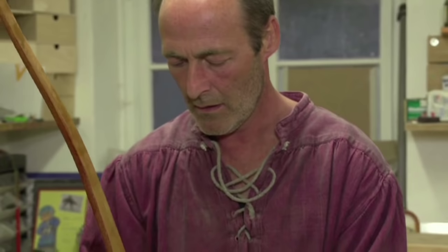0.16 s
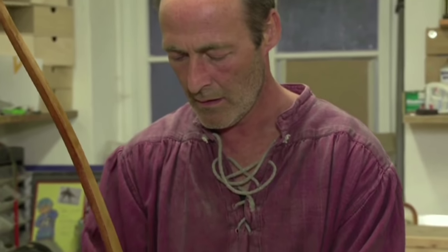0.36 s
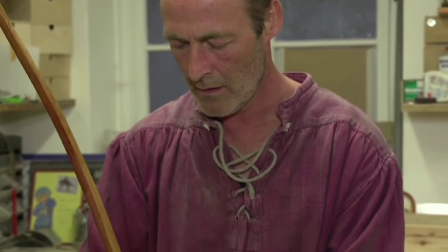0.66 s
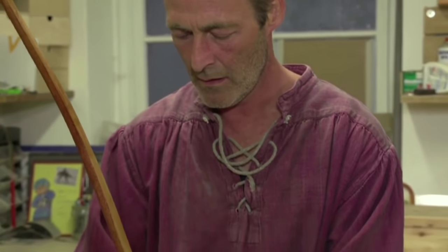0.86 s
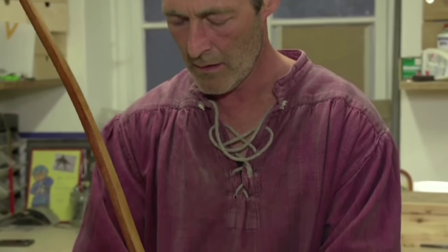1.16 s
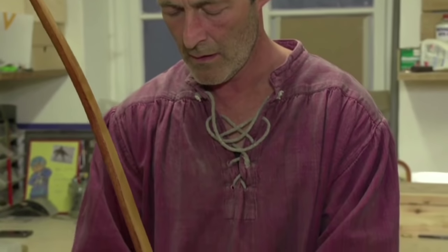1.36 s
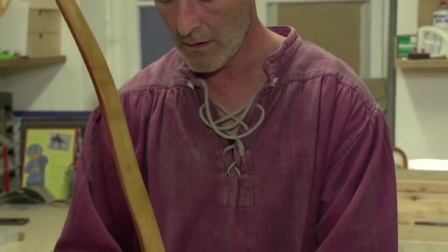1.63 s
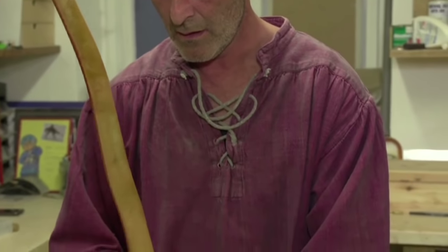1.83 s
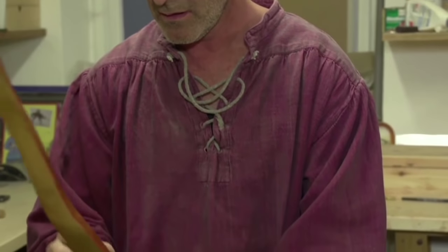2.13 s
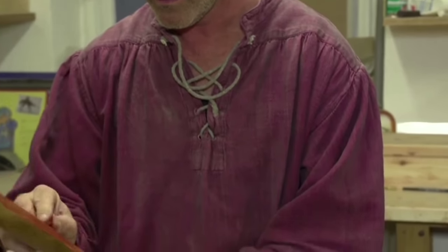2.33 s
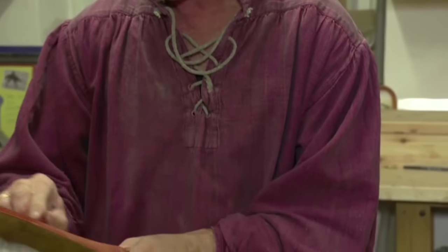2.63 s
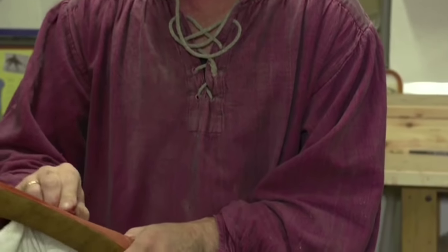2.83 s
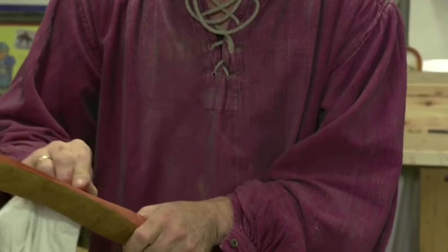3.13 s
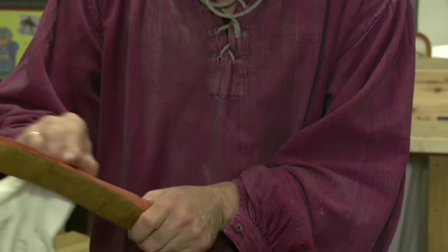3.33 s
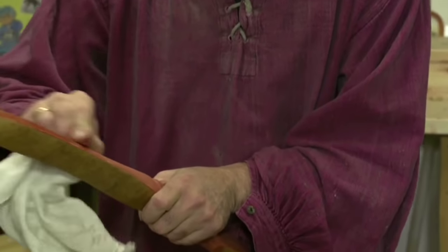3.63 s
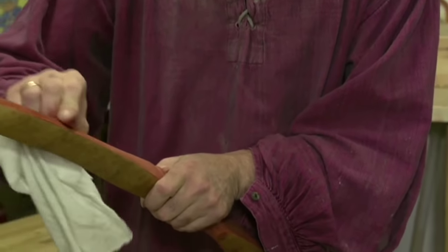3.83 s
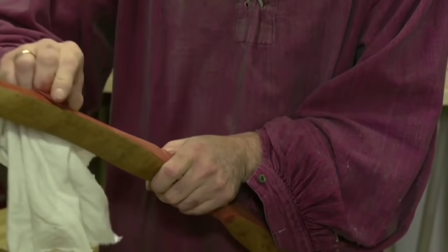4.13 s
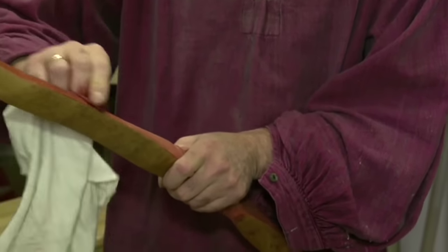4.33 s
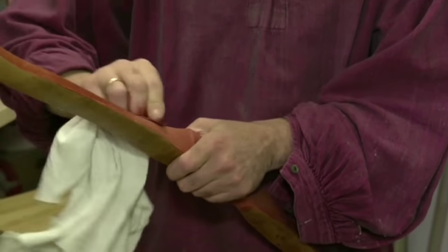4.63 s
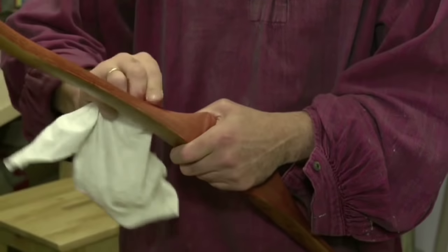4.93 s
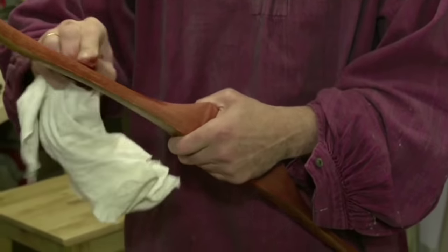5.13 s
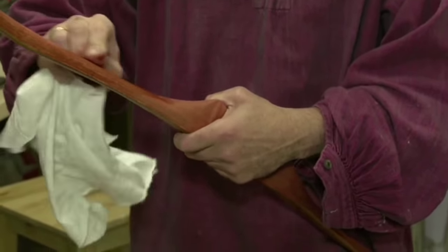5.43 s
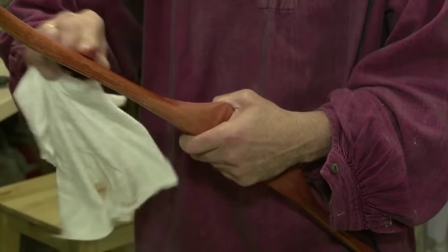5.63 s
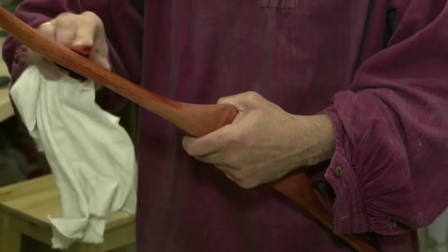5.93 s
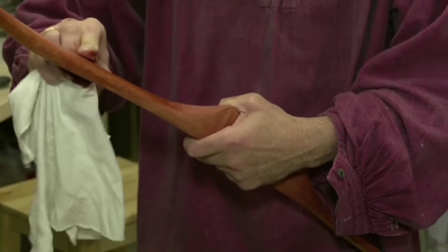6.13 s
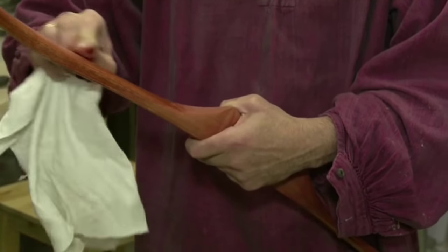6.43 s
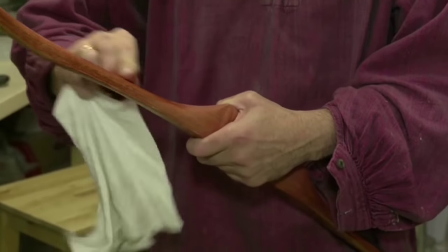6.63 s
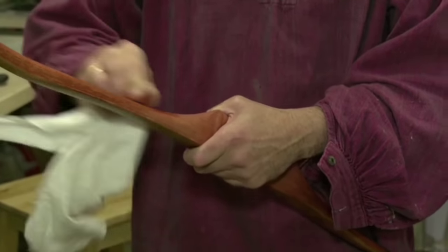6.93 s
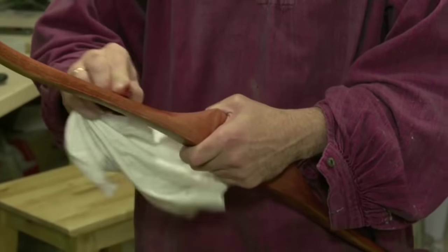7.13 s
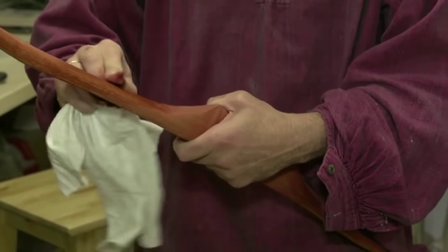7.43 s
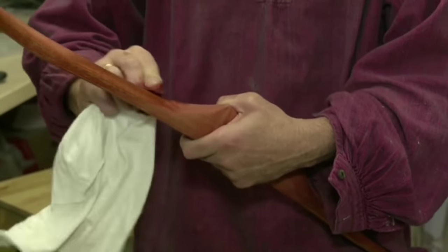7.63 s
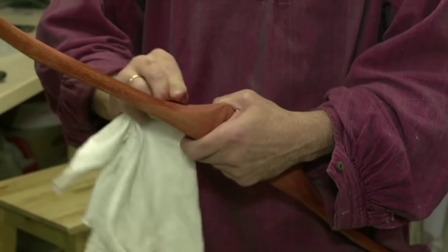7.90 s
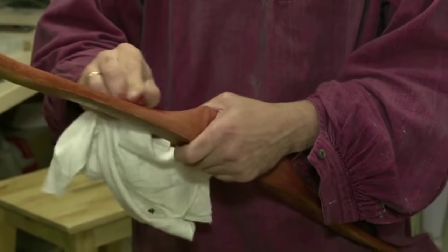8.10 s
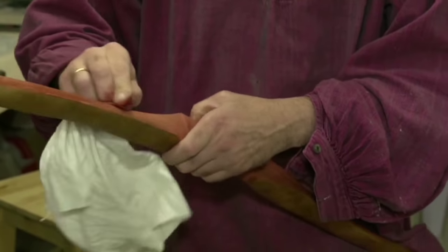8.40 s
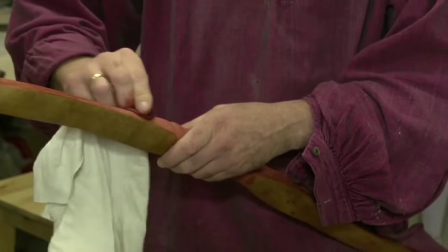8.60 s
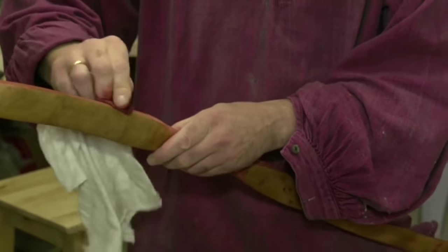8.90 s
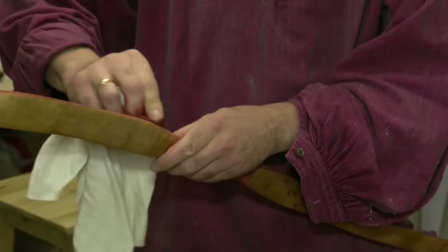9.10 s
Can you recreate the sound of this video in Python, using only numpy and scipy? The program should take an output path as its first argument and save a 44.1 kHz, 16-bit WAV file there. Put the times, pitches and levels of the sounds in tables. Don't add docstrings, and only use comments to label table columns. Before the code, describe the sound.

Close, quick, dry cloth strokes on smooth wood, faintly ringing with the grain, joined later by muffled thumps and a cluster of knocks over low room rumble.

```python
import sys
import numpy as np
from scipy import signal
from scipy.fft import rfft, irfft, next_fast_len
from scipy.io import wavfile
from scipy.ndimage import uniform_filter1d

SR = 44100
rng = np.random.default_rng(int(sys.argv[2]) if len(sys.argv) > 2 else 0)


def generate_wav(sig):
    pcm = np.round(np.clip(np.atleast_2d(sig).T, -1, 1) * 32767).astype(np.int16)
    wavfile.write(sys.argv[1], SR, pcm)


def natural_amplitude(level_db):
    exponent = np.asarray(level_db, float) / 20
    return 10 ** exponent


N = 408366
TIME_S = np.arange(N) / SR
PADDED = next_fast_len(N, True)
HZ = np.maximum(np.arange(PADDED // 2 + 1) * SR / PADDED, 1)


def rms_one(x):
    return x / np.sqrt(np.mean(x ** 2) + 1e-20)


def in_time(rows):
    s, *columns = np.transpose(rows)
    return [np.interp(TIME_S, s, column) for column in columns]


def bumps(rows):
    t = np.arange(0, N, 40) / SR
    lift_db = sum(db * np.exp(-((t - s) / half) ** 2) for s, half, db in rows)
    return np.interp(TIME_S, t, lift_db)


def at_hz(points):
    hz, value = np.transpose(points)
    return np.interp(np.log(HZ), np.log(hz), value)


def filtered(x, response):
    return irfft(rfft(x, PADDED) * response, PADDED)[..., :N]


def coloured(x, spectrum):
    return rms_one(filtered(x, natural_amplitude(at_hz(spectrum))))


def drift(rate):
    r = np.exp(-80 * np.pi * rate / SR)
    slow = signal.lfilter([1], [1, -2 * r, r * r], rng.standard_normal(N // 40 + 2002))[2000:]
    return np.interp(np.arange(N) / 40, np.arange(len(slow)), rms_one(slow))


def resonance(x, hz, width_hz):
    r = np.exp(-np.pi * width_hz / SR)
    top = np.array([1, 0, -1]) * (1 - r * r) / 2
    return signal.lfilter(top, [1, -2 * r * np.cos(2 * np.pi * hz / SR), r * r], x)


def fibre_slips(per_s, spread_db):
    sizes = natural_amplitude(spread_db * np.minimum(rng.exponential(1, N), 5)) * rng.choice([-1, 1], N)
    return rms_one(sizes * (rng.random(N) < per_s / SR))


# (start [s], length [s], level after the start [dB], level at the end [dB])
UP_STROKES = [(-0.03, 0.042, -53, -52), (0.219, 0.086, -51.5, -49.5), (0.556, 0.042, -57.5, -52.5),
              (0.84, 0.06, -51, -49.5), (1.487, 0.029, -58, -54), (1.9, 0.13, -70.5, -65),
              (2.256, 0.1, -46, -48.5), (2.548, 0.067, -50, -47.5), (2.817, 0.11, -46.5, -47),
              (3.123, 0.12, -46.5, -47.5), (3.426, 0.1, -48, -48), (3.696, 0.11, -49, -46.5),
              (3.991, 0.11, -49, -44), (4.317, 0.12, -48.5, -45.5), (4.646, 0.12, -48.5, -45.5),
              (4.957, 0.1, -47, -46), (5.231, 0.1, -48.5, -46.5), (5.507, 0.08, -48.5, -50),
              (5.739, 0.031, -50, -47), (5.947, 0.093, -50.5, -48), (6.26, 0.14, -50, -46.5),
              (6.71, 0.081, -48.5, -48), (7.007, 0.078, -48, -46), (7.291, 0.098, -48.5, -48),
              (7.62, 0.095, -49, -51.5), (7.91, 0.11, -48, -52.5), (8.231, 0.074, -50.5, -50),
              (8.485, 0.087, -51, -49.5), (8.758, 0.085, -49, -50.5), (9.023, 0.098, -51.5, -53)]
# (start [s], length [s], level after the start [dB], level at the end [dB])
DOWN_STROKES = [(0.074, 0.066, -53.5, -50), (0.36, 0.11, -52, -50), (0.675, 0.088, -53, -49),
                (0.986, 0.41, -52.5, -52), (1.597, 0.05, -58, -55), (2.069, 0.13, -49, -41),
                (2.417, 0.067, -47, -45.5), (2.689, 0.061, -46, -43.5), (2.98, 0.098, -47.5, -42.5),
                (3.282, 0.089, -47.5, -44), (3.582, 0.082, -45.5, -45), (3.87, 0.069, -44.5, -45.5),
                (4.148, 0.14, -47, -43), (4.494, 0.11, -48.5, -43), (4.812, 0.099, -46.5, -44.5),
                (5.102, 0.077, -43.5, -46.5), (5.383, 0.078, -45, -45.5), (5.625, 0.056, -46, -45.5),
                (5.843, 0.054, -46, -46.5), (6.078, 0.13, -47, -45.5), (6.492, 0.16, -50, -42),
                (6.875, 0.068, -49.5, -48), (7.16, 0.07, -49, -47.5), (7.444, 0.12, -51.5, -46),
                (7.763, 0.094, -51, -42), (8.064, 0.092, -53, -45.5), (8.36, 0.065, -49, -46),
                (8.61, 0.09, -48, -46.5), (8.892, 0.082, -49, -49), (9.175, 0.086, -54.5, -52)]
# (time [s], contact left at the turn [dB], tautness of the cloth as brightness [dB],
# freedom of the wood in the grip [dB])
HAND_HOLD = [(0.0, -59.5, 5, -6), (0.98, -58.5, -2, -4.5), (1.49, -59.5, -3.5, -4), (1.9, -64, -24, -0.5),
             (2.06, -50, 0, -3.5), (2.26, -51, -4, -5), (2.45, -56.5, -1.5, 2.5), (3.1, -52.5, -6, 1.5),
             (4.0, -54.5, -3.5, 0), (4.8, -50.5, -2, 1), (5.6, -53.5, -2, 1.5), (6.1, -57, -3.5, -2),
             (6.4, -56.5, 1.5, -5), (6.8, -52, -5, -1), (7.9, -54.5, -9, 2), (8.23, -59.5, -7, -4),
             (8.75, -57.5, -5.5, -3.5), (9.0, -63.5, -12, -5.5)]


def hand_strokes():
    usual_db, rise_down_s, rise_up_s = -47, .005, .008
    down_turn_db = -1.5
    duller_per_db = 0.55
    start, length, first_db, last_db = np.transpose(sorted(UP_STROKES + DOWN_STROKES))
    down = np.arange(len(start)) % 2
    s, turn_db, taut_db, _ = np.transpose(HAND_HOLD)
    turn_db = np.interp(start, s, turn_db) + down_turn_db * down
    turn_db = np.minimum(turn_db, first_db - 2.5)
    bright_db = np.interp(start, s, taut_db) - duller_per_db * (last_db - first_db)

    up_to_speed = start + np.where(down, rise_down_s, rise_up_s)
    times = np.stack([start, up_to_speed, start + length], axis=1).ravel()
    level = np.stack([turn_db, first_db, last_db], axis=1).ravel()
    slowing = np.stack([turn_db - first_db, 0 * start, 0 * start], axis=1).ravel()
    rows = np.stack([np.maximum.accumulate(times), level, slowing, np.repeat(bright_db, 3)], axis=1)
    level_db, slowing_db, bright_db = in_time(rows)
    pressure_db = level_db - slowing_db - usual_db
    grip_db = in_time(HAND_HOLD)[2]
    return level_db, slowing_db, bright_db, pressure_db, grip_db


# (frequency [Hz], level [dB per Hz])
SWISH_TONE = [(1060, -31), (1800, -5), (1950, -7), (2250, -5.5), (4270, -2), (5700, -3), (10300, 0),
              (14600, -6), (15500, -13.5)]
# (time [s], frequency [Hz], lift [dB])
CUPPED_HAND = [(0.02, 4270, 8.5), (0.11, 3900, 5.0), (0.26, 4300, 6), (0.41, 3850, 6), (0.57, 4100, 6.5),
               (0.72, 4500, 4), (0.87, 4100, 4.5), (1.19, 4760, 6), (1.5, 5100, 4.4), (1.62, 4480, 3),
               (1.96, 4600, 1.5), (2.13, 4600, -0.5), (2.31, 4600, 4), (2.45, 4100, 6.5), (2.58, 4500, 5),
               (2.72, 4300, 4.2), (2.87, 4430, 5.5), (3.03, 4170, 3), (3.18, 4700, 5.5), (3.33, 4300, 3),
               (3.47, 4480, 6.5), (3.62, 4800, 4), (3.75, 4700, 4), (3.91, 4930, 5), (4.05, 5000, 4.5),
               (4.22, 4350, 6), (4.38, 4740, 4.5), (4.55, 4500, 3.5), (4.71, 4730, 3.5), (4.86, 4930, 4.5),
               (5.01, 4100, 2), (5.14, 4600, 3.5), (5.28, 4430, 1.5), (5.42, 5060, 3.5), (5.54, 4600, 4),
               (5.65, 4900, 1.5), (5.75, 4800, 1.2), (5.87, 4320, 5.1), (5.99, 4500, 2.1), (6.14, 4600, 4),
               (6.33, 4300, 6), (6.57, 4240, 6.5), (6.75, 4940, 3.5), (6.91, 4700, 4.0), (7.04, 4900, 3),
               (7.2, 4800, 2.5), (7.34, 4400, 3), (7.5, 4800, 2.5), (7.67, 4900, 3.5), (7.81, 4670, 0),
               (7.96, 4650, 4.5), (8.11, 4600, 3.5), (8.27, 5100, 5), (8.39, 4800, 4), (8.53, 5000, 3),
               (8.65, 4770, 6.1), (8.8, 4970, 5.5), (8.93, 4770, 8), (9.07, 5130, 3.5), (9.21, 4430, 4.5)]


def swish(level_db, slowing_db, bright_db, pressure_db):
    air_loss_db, air_loss_after_db, air_return_s = 2.5, 2, .004
    fuller_per_db = -0.01
    flicker_db = 1.4
    echo_s, echo_wander_s, echo_db = .0028, .0005, -11

    slowed = 1 - np.exp(slowing_db / air_loss_after_db)
    keep = np.exp(-1 / (air_return_s * SR))
    slowed = np.maximum(slowed, signal.lfilter([1 - keep], [1, -keep], slowed))

    spectrum = rfft(coloured(fibre_slips(per_s=15000., spread_db=2.0), SWISH_TONE), PADDED)
    cup_hz, cup_db = in_time(CUPPED_HAND)
    third = np.clip(3 * np.log2(HZ / 4000), -4, 6)
    cup = 3 * np.log2(cup_hz / 4000)
    out = np.zeros(N)
    for centre in range(-4, 7):
        band = irfft(spectrum * np.clip(1 - abs(third - centre), 0, 1), PADDED)[:N]
        tilt_db = (max(centre, 1) - 2.5) / 4.63 * (bright_db + 7.5)
        dull_db = (0.19 + 0.074 * centre) * slowing_db
        full_db = fuller_per_db * max(1 - centre, 0) * pressure_db
        hollow_db = cup_db * np.exp(-((centre - cup) / 1.7) ** 2)
        thin_db = -air_loss_db * max(centre - 3, 0) * slowed
        out += band * natural_amplitude(tilt_db + dull_db + full_db + hollow_db + thin_db + flicker_db * drift(23.0))

    delay = SR * (echo_s + echo_wander_s * drift(1.5))
    out = out + natural_amplitude(echo_db) * np.interp(np.arange(N) - delay, np.arange(N), out)
    return natural_amplitude(level_db + 2.28 + 0.18 * drift(21.0)) * out


# (time [s], half length [s], frequency [Hz], level [dB])
SINGING_PITCHES = [(0.28, .05, 1728, -61), (0.43, .07, 1728, -62), (0.74, .05, 1740, -63),
                   (0.74, .05, 1240, -63), (0.27, .05, 3330, -60), (0.02, .01, 3330, -62),
                   (0.86, .03, 3330, -62), (1.56, .03, 1560, -66), (1.63, .03, 1563, -66),
                   (1.64, .04, 1830, -66), (1.77, .04, 1840, -67), (1.85, .07, 2280, -69),
                   (2.08, .03, 2050, -64), (1.73, .08, 2120, -65), (2.47, .04, 1800, -59),
                   (2.76, .05, 1800, -59), (2.85, .08, 1563, -61), (3.2, .08, 1563, -62),
                   (3.35, .05, 1800, -61), (4.04, .07, 1563, -60), (4.27, .06, 2300, -60),
                   (4.55, .08, 1563, -62), (5.15, .05, 1378, -62), (5.98, .06, 1563, -62),
                   (6.16, .07, 1563, -64), (6.16, .05, 2052, -62), (5.92, .03, 1800, -62),
                   (6.6, .06, 1600, -62), (7.85, .05, 2300, -60), (8.15, .05, 1800, -63),
                   (8.68, .06, 2300, -62), (0.58, .03, 1728, -68), (3.07, .035, 3900, -53),
                   (3.63, .04, 4300, -55), (4.26, .035, 4300, -53), (6.6, .055, 3350, -51),
                   (6.6, .04, 3950, -52), (8.4, .035, 4750, -52), (8.66, .045, 4500, -51),
                   (8.905, .01, 4600, -51), (8.95, .035, 5000, -55)]


def singing(slips):
    out = np.zeros(N)
    for s, half, hz, db in SINGING_PITCHES:
        span = np.arange(round((s - 2 * half) * SR), round((s + 2 * half) * SR))
        swell = np.exp(-((span / SR - s) / half) ** 2)
        width_hz = 36 * (hz / 1700) ** 2
        out[span] += natural_amplitude(db - 3) * swell * rms_one(resonance(slips[span], hz, width_hz))
    return out


def ringing(slips, modes):
    return rms_one(sum(natural_amplitude(db + 2.2 * drift(4.)) * resonance(slips, hz, width) for hz, width, db in modes))


# (frequency [Hz], width [Hz], level [dB])
UPRIGHT_MODES = [(1240, 40, -8), (1728, 38, 0), (3330, 90, -2)]
# (frequency [Hz], width [Hz], level [dB])
GRIPPED_MODES = [(1378, 36, -4), (1563, 26, 1), (1800, 42, 0), (2052, 38, -3), (2300, 40, -2)]
# (frequency [Hz], width [Hz], level [dB])
ROLLED_MODES = [(1378, 40, -6), (1563, 40, -6), (1800, 34, 0), (2052, 40, -6), (2300, 34, 1)]
# (frequency [Hz], level [dB per Hz])
BODY_TONE = [(700, -13.5), (1100, -5), (1500, -3.5), (2000, -11.5), (2600, -15), (4000, -18)]
# (time [s], half length [s], lift [dB])
CLOTH_CATCHES = [(0.28, 0.047, 4), (0.43, 0.065, -9), (0.74, 0.13, 2), (1.57, 0.082, 21), (1.83, 0.11, 8),
                 (2.13, 0.12, 14), (2.47, 0.035, 14), (2.75, 0.046, 9), (3.04, 0.049, -1),
                 (4.06, 0.054, 12), (6.19, 0.066, 11), (6.35, 0.047, 19), (6.63, 0.053, 4)]


def wood(slowing_db, pressure_db, grip_db):
    lowered_s, rolled_s = 1.2, 7.3
    slips = fibre_slips(per_s=3000., spread_db=2.5)
    catch_db = bumps(CLOTH_CATCHES)
    held = np.clip((TIME_S - lowered_s) / 0.26, 0, 1)
    rolled = np.clip((TIME_S - rolled_s) / 0.3, 0, 1)
    in_grip = (1 - rolled) * ringing(slips, GRIPPED_MODES) + rolled * ringing(slips, ROLLED_MODES)
    modes = (1 - held) * ringing(slips, UPRIGHT_MODES) + held * in_grip
    modes_db = -68.5 + 0.92 * pressure_db + 0.32 * catch_db + 0.46 * grip_db
    body_db = -59.5 + 0.42 * pressure_db + 0.18 * catch_db + grip_db + 1.64 * drift(9.0)
    limb = natural_amplitude(modes_db) * modes + natural_amplitude(body_db) * coloured(slips, BODY_TONE)
    return natural_amplitude(0.84 * slowing_db) * limb + singing(slips)


# (frequency [Hz], level [dB per Hz])
RUSTLE_TONE = [(200, -8), (330, -6.5), (600, -4.5), (1100, -6.5), (1600, -19), (2500, -69)]
# (time [s], half length [s], lift [dB])
CLOTH_BRUSHES = [(0.46, 0.14, 5), (2.16, 0.11, 13), (4.77, 0.094, 4), (5.21, 0.013, 5), (6.14, 0.03, 4),
                 (6.68, 0.02, 7), (7.445, 0.014, 2.5), (7.47, 0.035, 10.5), (7.7, 0.065, 8),
                 (7.85, 0.049, 1), (9.21, 0.039, 6)]


def rustle(slowing_db, pressure_db, grip_db):
    level_db = -67 + 0.099 * pressure_db + 0.88 * grip_db + bumps(CLOTH_BRUSHES) + 0.031 * slowing_db
    slips = fibre_slips(per_s=4000., spread_db=2.0)
    return natural_amplitude(level_db + 2.9 * drift(20.0)) * coloured(slips, RUSTLE_TONE)


def rubbing():
    level_db, slowing_db, bright_db, pressure_db, grip_db = hand_strokes()
    out = swish(level_db, slowing_db, bright_db, pressure_db)
    return out + wood(slowing_db, pressure_db, grip_db) + rustle(slowing_db, pressure_db, grip_db)


# (time [s], peak [dB], frequency [Hz], swell time [s])
SOFT_THUMPS = [(0.859, -45, 78, 0.028), (1.201, -42, 61.7, 0.03), (1.804, -42.5, 86.5, 0.031),
               (2.024, -42, 70.6, 0.025), (2.272, -45, 88, 0.014), (3.296, -40, 79, 0.016),
               (4.293, -39.5, 77.6, 0.015), (4.626, -39, 74, 0.018), (5.334, -35, 73.5, 0.014),
               (5.718, -31.5, 69, 0.02), (5.775, -38.5, 84.5, 0.021), (5.819, -38, 76, 0.018),
               (5.859, -37, 76, 0.01), (5.969, -35, 80.6, 0.015), (6.185, -38, 75, 0.011),
               (6.967, -32.5, 61, 0.013), (6.27, -45, 46, 0.024), (7.428, -27, 84.5, 0.025),
               (7.44, -36, 46, 0.03), (7.489, -33.5, 53, 0.022), (7.54, -29.5, 69, 0.015),
               (7.747, -33.5, 63.5, 0.015), (7.829, -38.5, 82, 0.015), (8.161, -37, 67.5, 0.021),
               (8.958, -31.5, 70, 0.016), (9.209, -23.5, 77.4, 0.024)]
# (time [s], peak [dB], frequency [Hz], swell time [s])
SHARP_KNOCKS = [
    (5.401, -40, 76, 0.021),
    (6.243, -25, 94.3, 0.01),
    (6.271, -29, 91.5, 0.013),
    (6.318, -30, 77.5, 0.011),
    (7.104, -33.5, 69, 0.013),
    (8.615, -35.5, 72, 0.022),
]
# (time [s], peak [dB])
HARD_TAPS = [(0.859, -57), (2.272, -57), (4.291, -55), (4.628, -63), (5.401, -54), (5.716, -38),
             (5.775, -54), (5.816, -52), (6.243, -40.5), (7.104, -58), (7.435, -50), (7.487, -51),
             (9.208, -48.5)]
TAP_MODES = [138, 223]


def thumps():
    out = np.zeros(N + SR)
    t = np.arange(SR // 4) / SR
    upper = sum(np.sin(2 * np.pi * hz * t) for hz in TAP_MODES)
    upper = upper * (t / 0.01 * np.exp(1 - t / 0.011)) ** 1.74
    sounds = [(s, natural_amplitude(peak_db) * upper) for s, peak_db in HARD_TAPS]
    for rows, roundness in ((SOFT_THUMPS, 2.05), (SHARP_KNOCKS, .9)):
        for s, peak_db, hz, swell_s in rows:
            swell = (t / swell_s * np.exp(1 - t / swell_s)) ** roundness
            sounds.append((s, natural_amplitude(peak_db) * swell * np.sin(2 * np.pi * hz * t)))
    for s, sound in sounds:
        at = round((s - .001) * SR)
        out[at:at + len(t)] -= sound
    return out[:N]


def shop(x):
    t60_s = 0.12
    t = np.arange(SR // 2) / SR
    tail = rng.standard_normal(len(t)) * natural_amplitude(-60 * t / t60_s) * (t > .006)
    tail = signal.lfilter([.5], [1, -.5], tail)
    return signal.fftconvolve(x, tail / np.sqrt(np.sum(tail ** 2)))[:N]


# (frequency [Hz], level [dB per Hz])
FLOOR_TONE = [(20, -43), (40, -6), (60, 2.5), (90, 2.5), (115, -7), (150, -13), (300, -52)]
# (time [s], half length [s], lift [dB])
FLOOR_SHUDDERS = [(0.12, 0.22, 1), (1.21, .1, 2.5), (2.1, 0.19, 3.5), (2.6, 0.15, 2.5), (3.0, 0.12, -3.5),
                  (3.85, 0.26, -0.5), (4.28, 0.13, 1.5), (5.0, 0.1, 5), (5.39, 0.17, 2.5),
                  (6.6, 0.13, -1.5), (7.22, 0.1, 6), (8.28, 0.09, 2), (9.13, 0.22, 5.5)]
# (frequency [Hz], level [dB per Hz])
AIR_TONE = [(100, -44), (170, 6.5), (230, -3.5), (270, -1.5), (400, -17), (700, -5), (1800, -4),
            (4000, -14), (9000, -54), (16000, -61)]
# (time [s], half length [s], lift [dB])
ROOM_SWELLS = [
    (0.4, 0.6, 2.5),
    (2.3, 0.89, -4.5),
    (3.6, 0.12, 6.5),
    (4.7, 0.33, -5),
    (6.0, 0.5, -1),
    (9.0, 0.44, 3.5),
]
# (frequency [Hz], width [Hz], level [dB])
MOTOR_HUM = [(204.1, 5.1, -65), (301, 14.5, -76.5), (405.5, 1.8, -77.5)]


def background():
    rumble_db = -50.5 + bumps(FLOOR_SHUDDERS) + 0.85 * drift(3.1)
    rumble = natural_amplitude(rumble_db) * coloured(rng.standard_normal(N), FLOOR_TONE)
    swell_db = bumps(ROOM_SWELLS)
    air = natural_amplitude(-66.5 + swell_db) * coloured(rng.standard_normal(N), AIR_TONE)
    hum = np.zeros(N)
    for hz, width, db in MOTOR_HUM:
        tone = rms_one(resonance(rng.standard_normal(N), hz, width))
        hum += natural_amplitude(db + (hz > 250) * swell_db) * tone
    hiss = natural_amplitude(-61.5) * filtered(rng.standard_normal(N), HZ / np.hypot(HZ, 4000))
    return rumble + air + hum + hiss


# (frequency [Hz], likeness [0-1])
PORT_LIKENESS = [(30, .96), (70, .999), (125, .962), (250, .905), (600, .925), (1400, .965), (2200, .93),
                 (3000, .93), (5000, .84), (9000, .76), (13000, .57), (16000, .55)]


def scene():
    left_lag_s, shop_db = 21e-6, -14
    shared, other = rubbing(), rubbing()
    shared = shared + natural_amplitude(shop_db) * shop(shared) + background() + thumps()
    other = other + natural_amplitude(shop_db) * shop(other) + background()
    alike = np.clip(at_hz(PORT_LIKENESS), 0, 1)
    mid = filtered(shared, np.sqrt((1 + alike) / 2))
    side = filtered(other, np.sqrt((1 - alike) / 2))
    half_lag = np.exp(-1j * np.pi * HZ * left_lag_s)
    return np.array([filtered(mid + side, half_lag), filtered(mid - side, 1 / half_lag)])


def top_cut(x):
    return signal.sosfilt(signal.butter(12, 15940, fs=SR, output="sos"), x)


# (time [s], length [s], share lost [0-1])
BRIEF_GAPS = [(2.835, .025, .9), (3.885, .035, .93), (4.045, .012, .8), (4.168, .032, .96),
              (4.73, .018, .92), (5.08, .03, .85), (6.215, .022, .93), (6.61, .018, .85),
              (6.666, .022, .95), (7.566, .018, .85), (7.865, .022, .6), (7.94, .03, .6), (8.46, .02, .88)]
# (frequency [Hz], share [0-1])
GAP_TONE = [(220, 0.1), (380, 1), (700, 1), (1200, 0.8), (2600, 0.25), (4000, 0)]


def record(dry):
    cut = signal.sosfilt(signal.ellip(9, .5, 65, 15400, fs=SR, output="sos"), dry)
    lost = np.zeros(N)
    for s, length, share in BRIEF_GAPS:
        lost[round((s - length / 2) * SR):round((s + length / 2) * SR)] = share
    lost = uniform_filter1d(lost, size=300)
    mix = cut - lost * filtered(cut, np.clip(at_hz(GAP_TONE), 0, 1))
    return top_cut(mix)


dry = scene()
out = record(dry)
generate_wav(out)
```